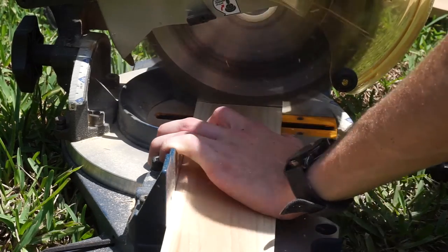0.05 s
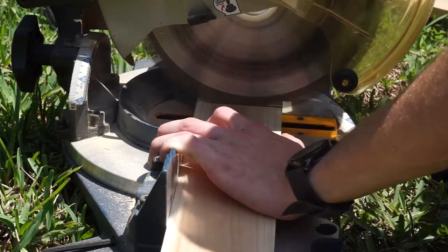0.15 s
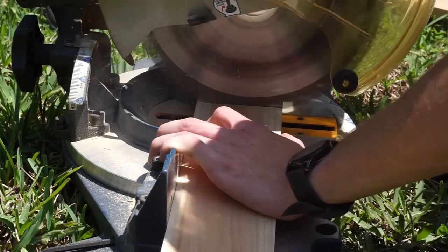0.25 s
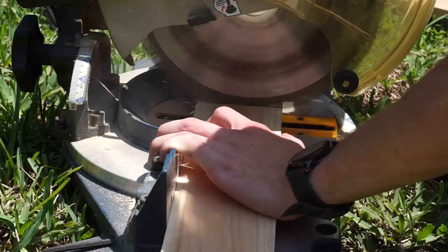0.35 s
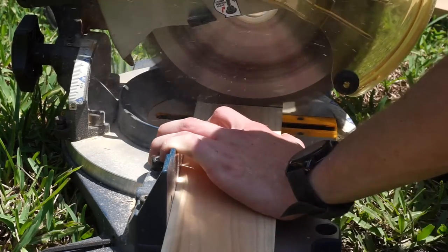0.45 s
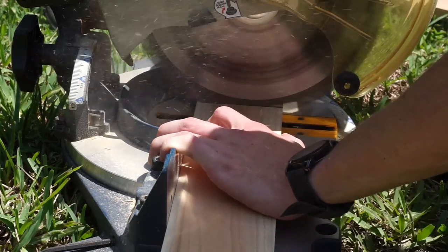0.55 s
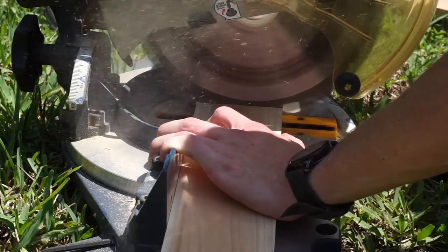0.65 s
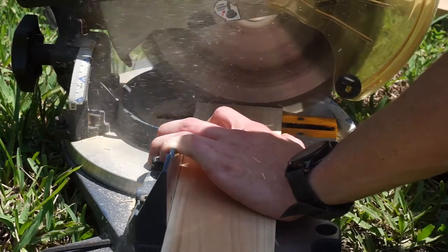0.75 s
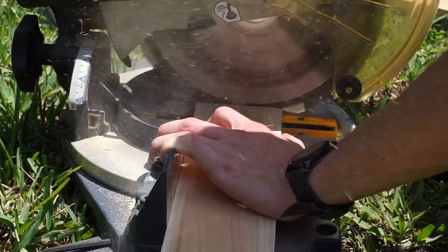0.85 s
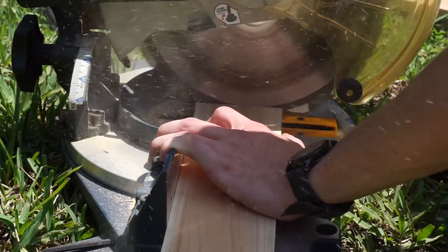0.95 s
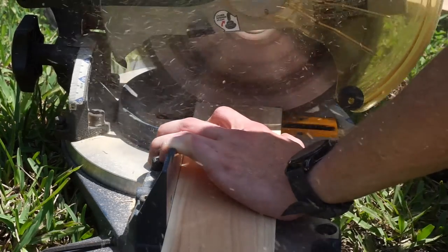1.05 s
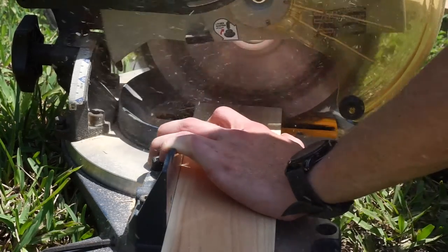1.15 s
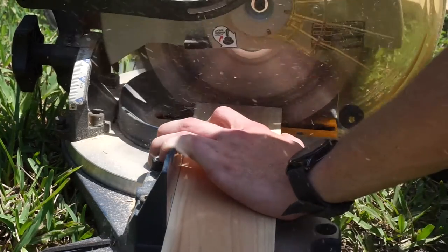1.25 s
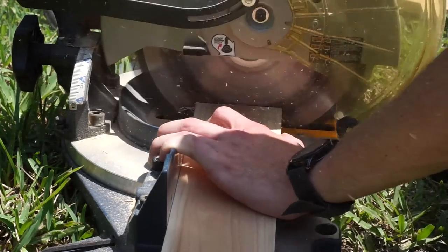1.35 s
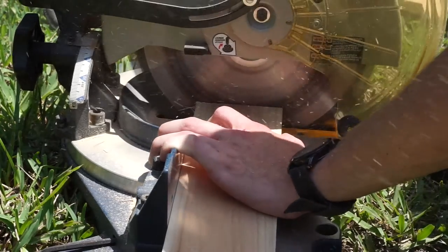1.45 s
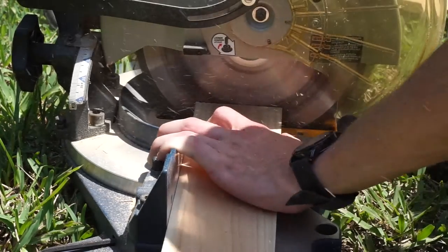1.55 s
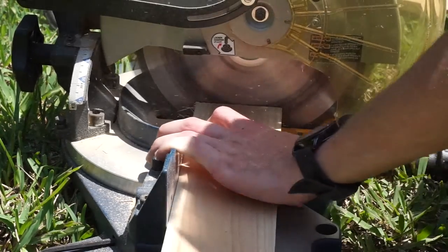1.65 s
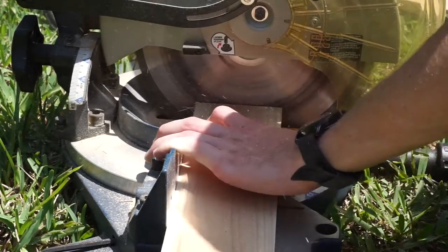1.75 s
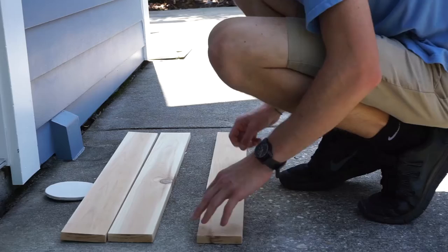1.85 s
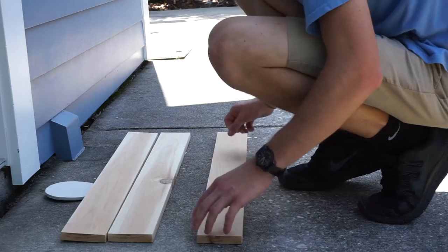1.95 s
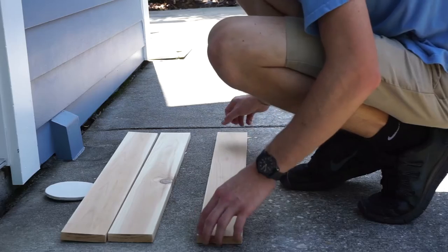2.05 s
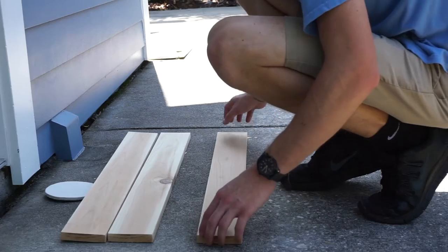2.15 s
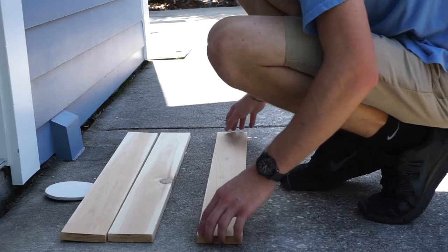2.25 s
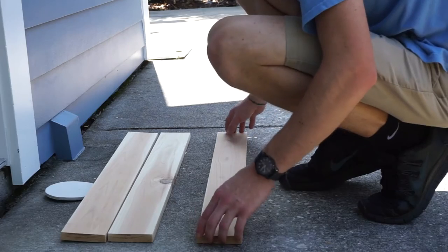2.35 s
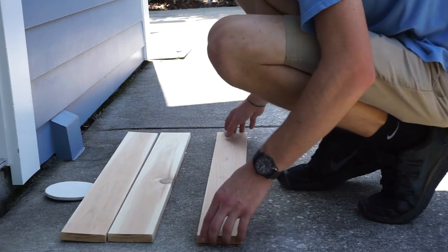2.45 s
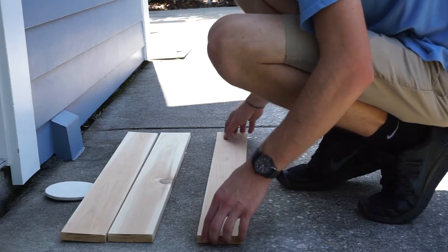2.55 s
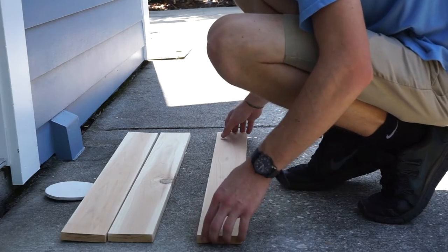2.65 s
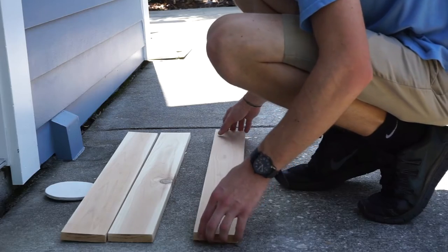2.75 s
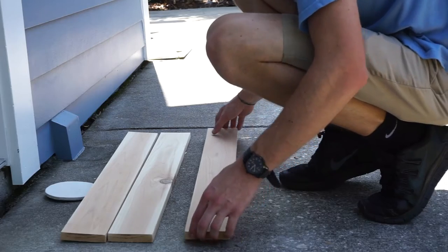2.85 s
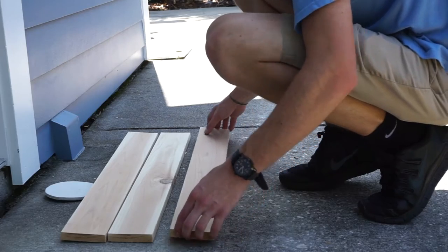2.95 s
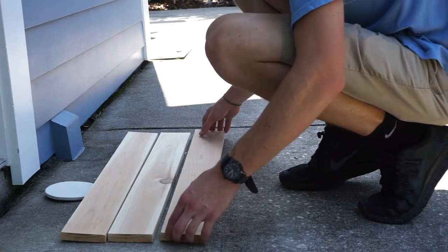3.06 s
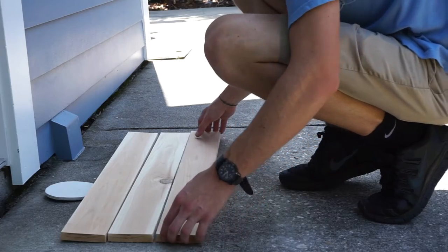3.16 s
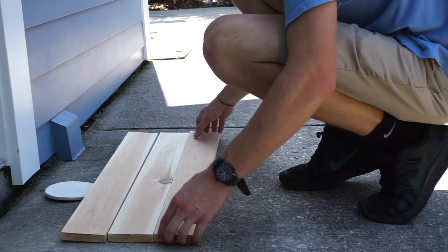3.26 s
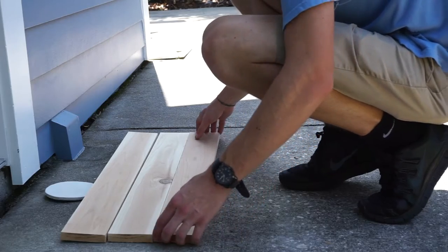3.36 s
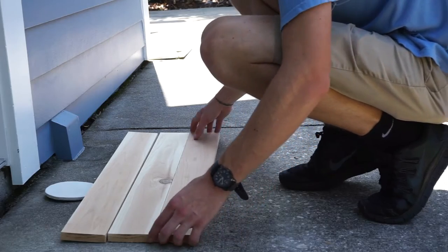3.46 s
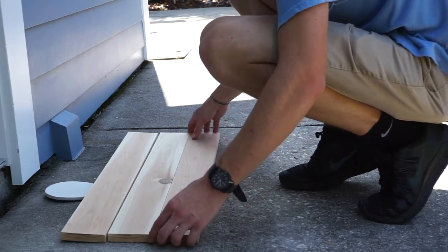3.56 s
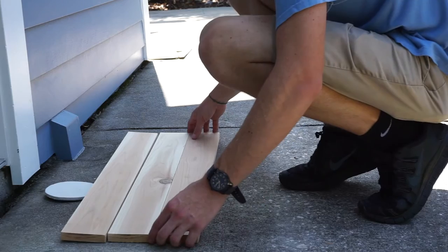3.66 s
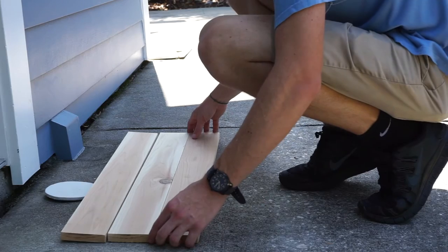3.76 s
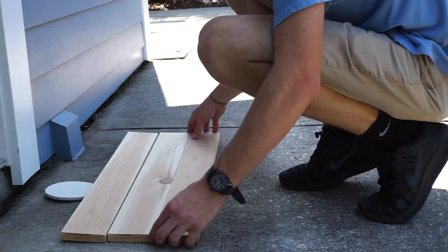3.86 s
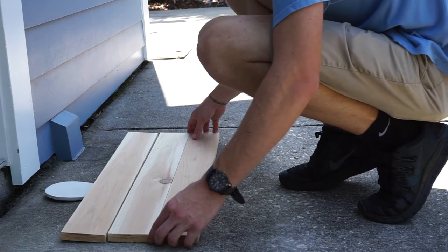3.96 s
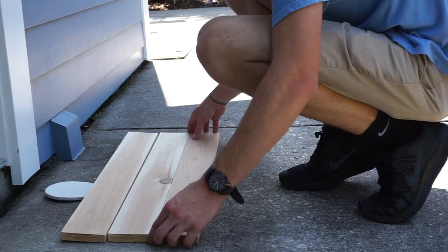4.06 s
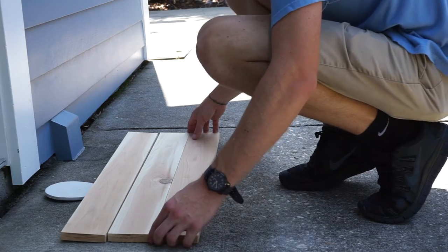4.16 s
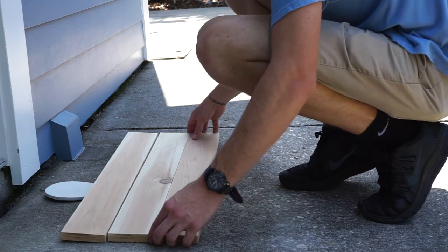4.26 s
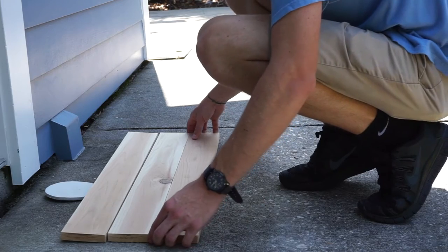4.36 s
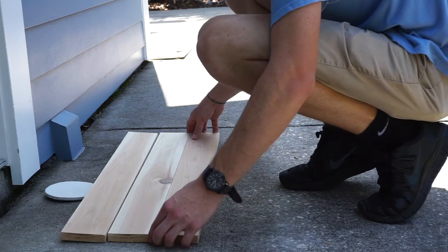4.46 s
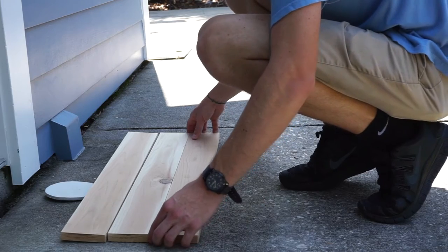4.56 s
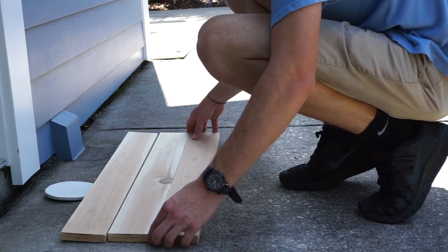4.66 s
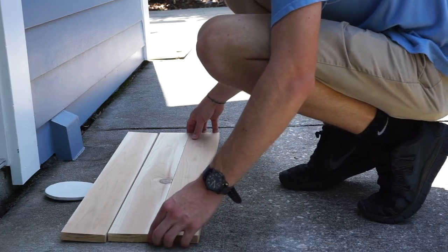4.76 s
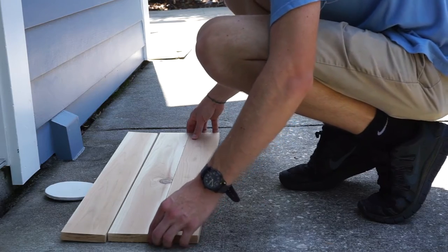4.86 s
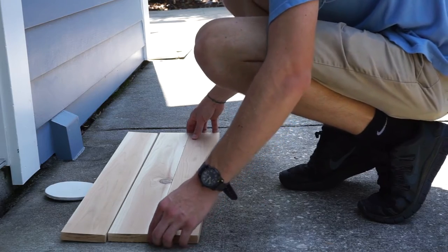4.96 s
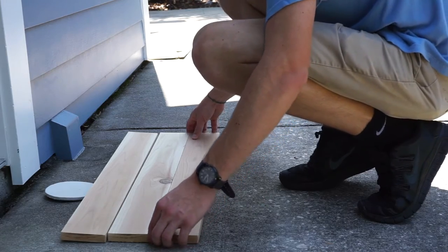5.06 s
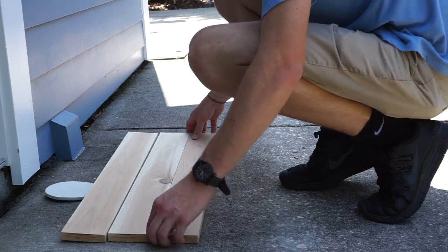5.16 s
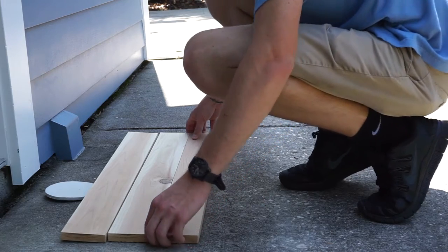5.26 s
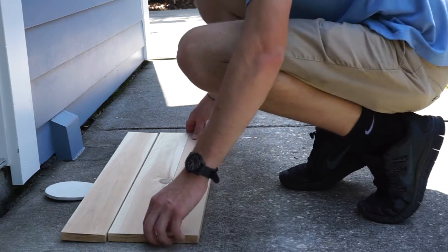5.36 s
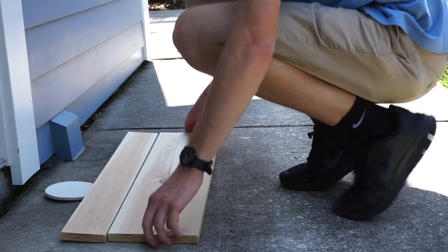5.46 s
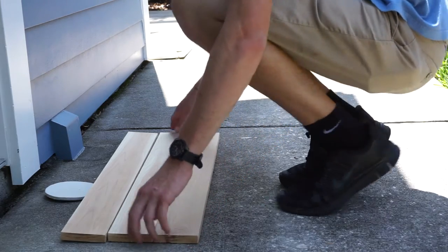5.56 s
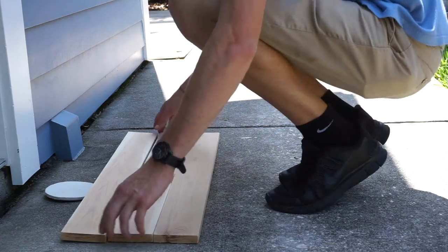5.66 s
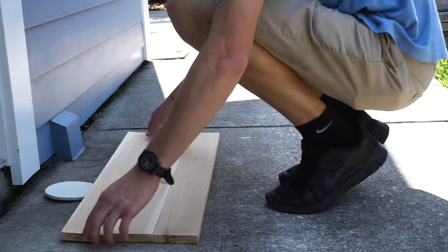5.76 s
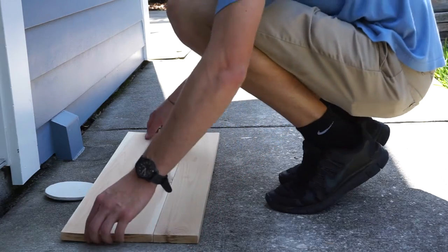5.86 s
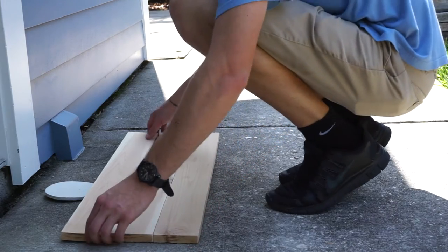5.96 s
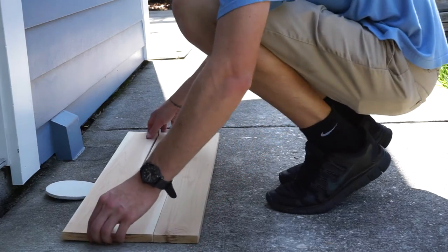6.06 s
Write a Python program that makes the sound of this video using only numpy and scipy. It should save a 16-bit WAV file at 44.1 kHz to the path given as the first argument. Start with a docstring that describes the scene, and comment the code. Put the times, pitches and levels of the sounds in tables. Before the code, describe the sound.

A power saw rasps through a board and brakes with a falling whine, followed by a light wooden knock, a gritty scuff and distant birdsong.

```python
"""On a lawn, a mitre saw cuts a board: teeth strike and tear the wood, the steel blade rings and squeals,
and the motor slows under load, runs free for a moment and is braked with a falling whine.
The scene jumps to a concrete path beside a house: boards knock together and a shoe crushes grit,
while birds sing, an air conditioner hums and traffic passes far off."""
import sys
import numpy as np
from scipy import signal
from scipy.fft import rfft, irfft, next_fast_len
from scipy.io import wavfile

SR = 44100
rng = np.random.default_rng(int(sys.argv[2]) if len(sys.argv) > 2 else 0)


def bounce(signal):
    """Save signal as a 16-bit WAV file at the path given by the first command-line argument."""
    frames = np.transpose(np.atleast_2d(signal))
    limited = np.clip(frames, -1, 1)
    pcm = np.round(limited * 32767).astype(np.int16)
    wavfile.write(sys.argv[1], SR, pcm)


N = 269892
TIME = np.arange(N) / SR
CUT_END_S, BRAKE_S, SCENE_CHANGE_S = 1.109, 1.455, 1.903
TOOTH_COUNT = 24

# Blade speed, sagging under load: time_s, tooth_rate_hz
BLADE_SPEED = [(0, 2015), (.135, 2008), (.94, 1746), (1.04, 1750), (1.12, 1800)]
# Drive partials: multiple_of_turn_rate, level_db
DRIVE_PARTIALS = [(9, -45.5), (29, -44), (53, -49.5), (82, -42), (96, -43), (101, -47.5), (108, -42),
                  (120, -41), (132, -40.5), (144, -40)]
def cutting():
    """The turning blade sets the pace of teeth, drive and the armature, which hums at peak load."""
    tooth_hz, = in_time(BLADE_SPEED)
    tooth_phase = turning(tooth_hz * (1 + 0.000644 * drift(25)))
    turn_phase = tooth_phase / TOOTH_COUNT
    teeth = tooth_tones(tooth_phase) * (1 + 0.2 * np.sin(turn_phase))
    drive = sum(from_db(db) * tone(k * turn_phase, rough=0.56, flutter_hz=7.57)
                for k, db in DRIVE_PARTIALS)
    load = envelope(0.65, hold_s=0.28, attack_s=2.2, release_s=0.2)
    armature = from_db(-48.5) * load * tone(5 * turn_phase, rough=0.2, flutter_hz=8)
    cut = teeth + drive + armature + rasp(tooth_phase, turn_phase) + squeal(turn_phase)
    return cut * until(CUT_END_S, fade_s=0.035)


# Tooth harmonics 1 to 3: level_db
TOOTH_HARMONICS = [-36.5, -35.5, -36]
# Harder bites: start_s, hold_s, harmonic, level_db
TOOTH_BITES = [(0.339, 0.11, 1, -26), (.53, 0.028, 1, -27), (0.621, 0.035, 1, -26), (0.705, 0.029, 1, -31),
               (0.852, 0.029, 3, -32), (0.899, .03, 2, -30), (0.996, .04, 1, -33.5)]
def tooth_tones(tooth_phase):
    """Teeth strike the wood in a steady train; a harder bite swells one harmonic."""
    tones = 0
    for k, steady_db in enumerate(TOOTH_HARMONICS, 1):
        bites = sum(from_db(db) * envelope(start_s, hold_s, attack_s=0.09, release_s=0.13)
                    for start_s, hold_s, harmonic, db in TOOTH_BITES if harmonic == k)
        tones += (from_db(steady_db) + bites) * tone(k * tooth_phase, rough=0.25, flutter_hz=29)
    return tones


# Chip rasp loudness: time_s, relative_db
RASP_CURVE = [(0.0, -26.5), (0.214, -28.5), (0.25, -22.5), (0.372, -29.5), (0.572, -24), (0.612, -28),
              (0.752, -24), (1.1, -25.5)]
# Chip rasp spectrum: frequency_hz, density_db
RASP_SPECTRUM = [(880, -23.5), (1500, -22.5), (1900, -13.5), (2150, -5.5), (2750, -18.5), (3300, -18.5),
                 (3700, -9.5), (4400, -12.5), (5000, -9), (5900, -8), (6600, 2.5), (7500, 0.5), (8100, 1.5),
                 (8800, 1), (9300, 0.5), (10600, 5), (11200, -9)]
def rasp(tooth_phase, turn_phase):
    """Chips tear out in pulses, one per tooth."""
    level_db, = in_time(RASP_CURVE)
    strokes = (1 + 0.79 * np.sin(tooth_phase)) * (1 + 0.15 * np.sin(turn_phase))
    torn = tearing(turn_phase, blows_db=0, grain_hz=1.68)
    return from_db(level_db + 2) * shaped(torn * strokes, RASP_SPECTRUM)


# Squeal spectrum: frequency_hz, density_db
SQUEAL_SPECTRUM = [(8800, -23), (9700, -9), (10300, -1.5), (10800, 7), (11300, -36)]
def squeal(turn_phase, fade_db_per_s=7):
    """The squeal throbs as the blade wobbles and flares when it rubs."""
    throb = 1 + 0.3 * np.sin(2 * turn_phase) + 0.42 * np.sin(4 * turn_phase)
    torn = tearing(turn_phase, blows_db=6, grain_hz=2.5)
    level = from_db(-27 - fade_db_per_s * TIME) + rubbing()
    return level * shaped(torn * throb, SQUEAL_SPECTRUM)


# Saw stereo width: frequency_hz, side_minus_mid_db
SAW_SIDE = [(60, -12.5), (130, -17.5), (270, -18), (570, -18.5), (1200, -13), (2550, -7.5), (5390, -6),
            (11400, -7.5)]
def tearing(turn_phase, blows_db, grain_hz):
    """Repeating tooth blows change slowly with the grain; chips break at random."""
    blend = 0.45 * drift(grain_hz)
    blows = [np.cos(blend) * tooth_blows(turn_phase) + np.sin(blend) * tooth_blows(turn_phase)
             for _ in range(2)]
    chips = casing(grains(per_s=27000, spread_db=9), t60_s=0.0937, wet=1)
    return spread(from_db(blows_db) * np.array(blows) + chips, SAW_SIDE)


def tooth_blows(turn_phase, points=2048, harmonics=170):
    """No two teeth are alike, so one ragged pattern returns on every turn."""
    partials = rng.uniform(0.4, 1.4, harmonics) ** 2 * np.exp(2j * np.pi * rng.random(harmonics))
    pattern = irfft(np.append(0, partials), points)
    angles = np.linspace(0, 2 * np.pi, points, endpoint=False)
    return rms_one(np.interp(turn_phase, angles, pattern, period=2 * np.pi))


# Blade rubs: start_s, hold_s, relative_db
KERF_RUBS = [(.195, .04, -27), (.955, 0.017, -35), (1.03, 0.0078, -37)]
def rubbing():
    """Gain of the screeches where the blade rubs the kerf."""
    return sum(from_db(db) * envelope(start_s, hold_s, attack_s=0.2, release_s=0.087)
               for start_s, hold_s, db in KERF_RUBS)


# High blade modes: pitch_hz, relative_db
PINCH_MODES = [(5760, -45), (7020, -38), (7488, -42), (8016, -44.5), (8737, -38.5), (8893, -42),
               (9615, -41), (10255, -45), (10497, -38)]
def pinched_blade(deep_s=0.8, shriek_hz=10560):
    """High modes grow as the blade sinks into the wood; one shrieks at each rub."""
    modes = sum(from_db(db) * tone(2 * np.pi * hz * TIME, rough=1.2, flutter_hz=17.8)
                for hz, db in PINCH_MODES)
    depth = envelope(deep_s, CUT_END_S - deep_s, attack_s=3.03, release_s=0.15)
    shriek = rubbing() * tone(2 * np.pi * shriek_hz * TIME, rough=1.2, flutter_hz=90)
    return from_db(1.5) * depth * modes + from_db(-2) * shriek


# Motor loudness in the cut: time_s, roar_relative_db, air_relative_db
MOTOR_CURVE = [(0.0, -32, -30), (0.032, -27.5, -29), (0.288, -36, -39.5), (0.314, -33, -34),
               (0.348, -39, -40), (0.406, -35, -32.5), (0.692, -37, -38.5), (1.086, -33.5, -33),
               (1.1, -33.5, -33)]
def motor():
    """The running motor shakes the housing, moves air and keeps the blade ringing."""
    roar_db, air_db = in_time(MOTOR_CURVE)
    return housing_roar(roar_db) + air_rush(air_db) + blade_ring(roar_db)


# Housing spectrum: frequency_hz, density_db
ROAR_SPECTRUM = [(60, -63), (150, -34), (280, -22.5), (450, -12), (660, -0.5), (1000, 3), (1250, -6),
                 (1550, 0), (2300, -5), (3200, -13.5), (6000, -17), (11000, -42.5)]
def housing_roar(cut_db, rise_db_per_s=10):
    """The housing roars louder as the freed motor speeds up and fades under the brake."""
    level = from_db(cut_db + 0.5 + rise_db_per_s * free_run_s() + 0.9 * drift(40))
    roar = shaped(casing(noise(SAW_SIDE), t60_s=0.06, wet=0.36), ROAR_SPECTRUM)
    return level * speed_left() ** 1.45 * roar


# Air at speed: frequency_hz, density_db
RUSH_SPECTRUM = [(1200, -29), (2000, -5), (2800, 0.5), (3300, -2.5), (3800, -2), (4200, 2.5), (4600, 0.5),
                 (5100, -0.5), (5800, 0), (6400, 3), (7000, 0.5), (7500, -3), (7900, -2.5), (9000, -4.5),
                 (11000, -7.5)]
# Hollow of the guard: frequency_hz, density_db
GUARD_SPECTRUM = [(1200, -2.5), (1900, -9), (2400, 8), (3150, -6), (3500, 0.5), (3900, 3), (4400, -5.5),
                  (4950, -14), (5500, -14), (5850, -1), (6150, 4), (6700, -3.5), (7600, -5), (9200, -9.5),
                  (11000, -11.5)]
def air_rush(cut_db, rise_db_per_s=7):
    """Air rushes through fan and teeth; as they slow, the hollow of the guard is left."""
    rush = shaped(casing(noise(SAW_SIDE), t60_s=0.075, wet=0.76), RUSH_SPECTRUM)
    hollow = from_db(0.5) * shaped(noise(SAW_SIDE), GUARD_SPECTRUM)
    rush_share = until(1.563, fade_s=0.15)
    air = np.sqrt(rush_share) * rush + np.sqrt(1 - rush_share) * hollow
    chip_stream_db = 2.5 * until(CUT_END_S, fade_s=0.04)
    level = from_db(cut_db + 4.5 + chip_stream_db + rise_db_per_s * free_run_s() + 0.97 * drift(60))
    return level * speed_left() ** 1.42 * air


# Blade and guard modes: pitch_hz, width_hz, relative_db
STEEL_MODES = [(672.6, 41, -39.5), (1093, 22, -41.5), (1382, 8.7, -42.5), (2214, 30, -39.5),
               (2540, 13, -41.5), (2855, 16, -43), (3086, 20.06, -40.5), (3420, 16, -43.5),
               (3644, 16, -42.5), (3800, 19.7, -45), (3850, 20, -40.5), (4020, 16, -39.5),
               (4770, 16, -47.5), (5538, 20.2, -38.5), (6010, 27.7, -48), (6526, 40, -43)]
def blade_ring(roar_db, fade_db_per_s=27.5, exit_hz=3640):
    """Steel rings with the roar, sounds a last note on leaving the kerf and fades."""
    steel = sum(from_db(db) * tone(2 * np.pi * hz * TIME, rough=1.5, flutter_hz=width_hz / 2)
                for hz, width_hz, db in STEEL_MODES)
    steel_db = roar_db + 31.5 - fade_db_per_s * np.maximum(TIME - CUT_END_S, 0)
    exit_level = from_db(-29) * envelope(CUT_END_S, 0, attack_s=0.3, release_s=1.26)
    exit_note = tone(2 * np.pi * exit_hz * TIME, rough=0.404, flutter_hz=12)
    return from_db(steel_db) * steel + exit_level * exit_note


def fan(start_hz=4330, rise_hz_per_s=1900):
    """Two turbulent bands rise with the freed motor and fall with the brake."""
    phase = turning((start_hz + rise_hz_per_s * free_run_s()) * speed_left())
    lower = tone(phase, rough=5.2, flutter_hz=300)
    upper = from_db(0.5) * tone(1.52 * phase, rough=6, flutter_hz=405)
    level = from_db(-36) * envelope(CUT_END_S, BRAKE_S - CUT_END_S, attack_s=0.25, release_s=0.4)
    return level * (lower + upper)


# Housing peak and notch: centre_hz, width_hz, gain_db
HOUSING_RESONANCES = [(684, 40, 14), (1212, 240, -6.5)]
def brake(start_hz=2304):
    """The braked motor's whine glides down through the housing resonances, gear tones above it."""
    hz = start_hz * speed_left()
    phase = turning(hz * (1 + 0.03 * drift(200)))
    gears = from_db(-4) * tone(1.78 * phase, rough=1.6, flutter_hz=110)
    gears += from_db(-8) * tone(3.2 * phase, rough=2.3, flutter_hz=250)
    gears *= until(2.02, fade_s=0.17) * (1 - until(1.475, fade_s=0.08))
    housing_db = sum(db / (1 + (2 * (hz - centre_hz) / width_hz) ** 2)
                     for centre_hz, width_hz, db in HOUSING_RESONANCES)
    whine = from_db(housing_db) * tone(phase, rough=0.8, flutter_hz=110)
    level = from_db(-28.5) * envelope(BRAKE_S, 0, attack_s=0.18, release_s=1.3)
    return casing(level * (whine + gears), t60_s=0.072, wet=0.53)


def free_run_s():
    """Time run without load, held once the brake closes."""
    return np.clip(TIME, CUT_END_S, BRAKE_S) - CUT_END_S


def speed_left(quarter_speed_s=0.49):
    """Share of motor speed left under the brake."""
    return 1 / (1 + np.maximum(TIME - BRAKE_S, 0) / quarter_speed_s) ** 2


def casing(x, t60_s, wet):
    """Guard, fence and table ring briefly at many close frequencies."""
    t = TIME[:SR // 8]
    tail = rng.standard_normal((1, len(t))) * from_db(-60 * t / t60_s)
    return x + wet * signal.fftconvolve(x, tail / np.sqrt(np.sum(tail ** 2)), axes=1)[:, :N]


# Sand under the sole: time_s, relative_db
SOLE_CURVE = [(5.36, -69), (5.448, -53.5), (5.472, -47), (5.482, -35.5), (5.528, -27), (5.576, -32),
              (5.61, -28.5), (5.704, -54), (6.0, -79)]
# Light board slides: start_s, hold_s, level_db, attack_s, release_s
BOARD_SLIDES = [(3.143, 0.21, -56.5, .28, .8), (6.059, .005, -42.5, .09, .24)]
# Crushed sand spectrum: frequency_hz, density_db
SAND_SPECTRUM = [(180, -55), (300, -26), (473, -13.5), (518, -16), (650, -5.5), (803, -2.5), (1120, -14),
                 (1250, -4), (1430, -9.5), (1560, -14), (1710, -10), (2050, -6), (5330, -12), (9630, -14.5),
                 (11200, -12.5), (14600, -47), (22000, -120)]
# Scuff stereo width: frequency_hz, side_minus_mid_db
SCUFF_SIDE = [(60, -24), (170, -14), (490, -17), (1400, -11), (3990, 1), (11400, 1)]
def scuff():
    """Sole and boards slide over concrete, crushing a dense stream of sand grains."""
    sole_db, = in_time(SOLE_CURVE)
    start_s, end_s = SOLE_CURVE[0][0], SOLE_CURVE[-1][0]
    sole = from_db(sole_db + 5) * envelope(start_s, end_s - start_s, attack_s=0.2, release_s=0.2)
    slides = sum(from_db(db) * envelope(s, hold_s, attack_s, release_s)
                 for s, hold_s, db, attack_s, release_s in BOARD_SLIDES)
    sand = spread(grains(per_s=11000, spread_db=1), SCUFF_SIDE) * from_db(0.73 * drift(130))
    return (sole + slides) * shaped(sand, SAND_SPECTRUM) + sole_ring()


# Sole and board modes: pitch_hz, relative_db, t60_s
SOLE_MODES = [(880, 1.5, 0.062), (1360, -20, 0.033), (1586, 14, 0.022), (1900, 10.5, 0.022),
              (2460, 6, 0.025), (2720, 3, 0.026), (2880, -2, 0.028)]
def sole_ring():
    """Grains slipping under pressure ring sole and boards, which radiate little bass."""
    slips = spread(grains(per_s=2300, spread_db=2.5), SCUFF_SIDE)
    modes = [(hz, from_db(db) * ring(slips, hz, t60_s)) for hz, db, t60_s in SOLE_MODES]
    body = sum(pressure(hz) * mode for hz, mode in modes) / np.std(sum(mode for _, mode in modes))
    return colour(body, [(150, -65), (300, -31), (700, -3.5), (3000, 0.5), (6000, -17), (6600, -77)])


# Weight on the sole: start_s, hold_s, relative_db, tilt_db_per_octave
SOLE_PUSHES = [(5.468, .003, -39, -7), (5.489, 0.017, -28, 4), (5.517, 0.017, -26, -7),
               (5.606, .005, -27.5, -10), (5.633, .005, -34, 12)]
def pressure(hz, pivot_hz=1586):
    """How hard the pushes drive a mode of this pitch."""
    octaves = np.log2(hz / pivot_hz)
    return sum(from_db(db + tilt * octaves) * envelope(start_s, hold_s, attack_s=0.034, release_s=0.1)
               for start_s, hold_s, db, tilt in SOLE_PUSHES)


# Board contacts: start_s, relative_db
BOARD_KNOCKS = [(3.2205, -31.5), (3.2285, -52), (3.2365, -38)]
# Board modes: pitch_hz, relative_db, t60_s
BOARD_MODES = [(527, -12, 0.087), (618, -8, .05), (690, -1, 0.09), (1070, -11.5, 0.066), (1324, -11, 0.068),
               (1720, -11, .025), (2040, -9, .03), (2410, -7.5, 0.038)]
def boards():
    """A narrow board knocks on its neighbour and rings with little bass."""
    clicks = np.zeros(N)
    for start_s, db in BOARD_KNOCKS:
        clicks[int(start_s * SR)] = from_db(db)
    wood = sum(from_db(db) * ring(clicks, hz, t60_s) for hz, db, t60_s in BOARD_MODES)
    wood = colour(wood, [(150, -24), (480, -0.5)])
    return wood + from_db(-6) * echoes(wood, t60_s=0.16)


# Cracking grit: start_s, level_db, centre_hz, t60_s
GRIT_CRACKS = [(2.227, -44.5, 2600, 0.22), (2.776, -43, 2800, .05), (2.856, -45.5, 5240, 0.028),
               (3.30, -50.5, 2400, 0.61), (5.078, -47, 5200, .025), (5.466, -42, 2000, .025),
               (5.481, -28, 7000, 0.02), (5.4895, -28, 2460, 0.056), (6.063, -57, 6000, .1)]
def grit():
    """Grit cracks under boards and fingers in short bursts."""
    crackle = spread(grains(per_s=7800, spread_db=4), YARD_SIDE)
    cracks = 0
    for start_s, db, hz, t60_s in GRIT_CRACKS:
        level = from_db(db - 60 * np.maximum(TIME - start_s, 0) / t60_s) * (TIME >= start_s)
        cracks += level * shaped(crackle, [(hz / 5, -12), (hz, 0), (11000, -14)])
    return cracks


def near_bird(start_s=5.67, hold_s=0.26, start_hz=2450, sag_hz_per_s=950, fade_db_per_s=9):
    """One wavering whistle sinks, swells once and fades."""
    age_s = np.clip(TIME - start_s, 0, 2 * hold_s)
    phase = turning((start_hz - sag_hz_per_s * age_s) * (1 + 0.012 * drift(114)))
    overtone = 0.15 * tone(2 * phase, rough=2, flutter_hz=90)[0]
    held = envelope(start_s, hold_s, attack_s=0.08, release_s=0.15)
    swell = from_db(-41) * envelope(5.728, hold_s=0.0089, attack_s=0.08, release_s=0.059)
    level = from_db(-49 - fade_db_per_s * age_s + 2.9 * drift(30)) * held + swell
    whistle = level * (np.sin(phase) + overtone)
    return whistle + 0.4 * echoes(whistle, t60_s=0.25)


# Two-note calls: start_s, first_pitch_hz, first_relative_db, second_relative_db
TWO_NOTE_CALLS = [(2.282, 3650, -48, -45.5), (2.523, 3535, -47, -48), (2.823, 3400, -47, -48.5),
                  (3.76, 3690, -47.5, -48), (4.018, 3380, -46, -47), (5.888, 3210, -51, -54)]
def far_birds():
    """Two-note calls and a sinking run of even notes, smeared by the trees."""
    warble = 1 + 0.0395 * drift(182)
    song = np.zeros(N)
    for start_s, hz, first_db, second_db in TWO_NOTE_CALLS:
        song += from_db(first_db) * chirp(start_s, warble, length_s=0.069, start_hz=hz, fall=0.23)
        song += from_db(second_db) * chirp(start_s + 0.114, warble, length_s=0.05, start_hz=3645, fall=0.14)
    for k in range(6):
        note = chirp(4.657 + 0.136 * k, warble, length_s=0.093, start_hz=3250 - 44 * k, fall=0.135)
        song += from_db(-52) * note
    return from_db(-2) * song + from_db(2.5) * echoes(song, t60_s=0.85)


def chirp(start_s, warble, length_s, start_hz, fall):
    """One warbling note that loses the share `fall` of its pitch."""
    progress = np.linspace(0, 1, int(length_s * SR))
    span = int(start_s * SR) + np.arange(len(progress))
    hz = start_hz * (1 - fall + fall * (1 - progress) ** 1.4) * warble[span]
    note = np.zeros(N)
    note[span] = np.sin(turning(hz)) * np.sqrt(np.abs(np.sin(np.pi * progress)))
    return note


# Air conditioner partials: pitch_hz, level_db
HUM_PARTIALS = [(58.3, -59.5), (118.5, -62.5), (177, -66.5)]
def air_conditioner():
    """A low hum wavers in phase and strength."""
    hum = 0
    for hz, db in HUM_PARTIALS:
        partial = np.sin(2 * np.pi * hz * TIME + 0.55 * drift(2.4))
        hum += from_db(db) * rms_one(partial * (1 + 0.46 * drift(6.7)))
    return hum


# Far traffic spectrum: frequency_hz, density_db
TRAFFIC_SPECTRUM = [(15, -48), (25, -31), (44, -20), (64, -13), (81, -15), (119, -1.5), (146, -10),
                    (426, -6), (509, -9), (657, -7), (1490, -13), (2360, -17.5), (2970, -18.5),
                    (3930, -24.5), (11200, -34.5), (14600, -69), (22000, -120)]
# Yard stereo width: frequency_hz, side_minus_mid_db
YARD_SIDE = [(60, -28), (140, -17), (350, -10), (830, -5), (1980, -2), (4760, 0), (11400, 0.5)]
def traffic():
    """Far traffic blends into a low, slightly flickering wash."""
    return from_db(-46.79 + 0.81 * drift(18)) * shaped(noise(YARD_SIDE), TRAFFIC_SPECTRUM)


def echoes(x, t60_s):
    """Diffuse scatter from walls and trees, different at each ear."""
    t = TIME[:SR]
    tail = rng.standard_normal((2, len(t))) * from_db(-60 * t / t60_s)
    tail /= np.sqrt(np.sum(tail ** 2, axis=1, keepdims=True))
    return spread(signal.fftconvolve(x[None], tail, axes=1)[:, :N], YARD_SIDE)


def from_db(db):
    """Decibels to gain."""
    return 10 ** (np.asarray(db) / 20)


def rms_one(x):
    """Scale to unit power."""
    return x / np.sqrt(np.mean(x ** 2) + 1e-20)


def in_time(rows):
    """Each column of a curve at every sample."""
    time_s, *columns = np.transpose(rows)
    return [np.interp(TIME, time_s, column) for column in columns]


def turning(hz):
    """Running phase in radians."""
    return 2 * np.pi * np.cumsum(hz) / SR


def until(end_s, fade_s):
    """Linear fade from one to zero, centred on end_s."""
    return np.clip(0.5 + (end_s - TIME) / fade_s, 0, 1)


def envelope(start_s, hold_s, attack_s, release_s):
    """Rise to one at start_s, hold, decay; attack and release each span 60 dB."""
    before = np.maximum(start_s - TIME, 0) / attack_s
    after = np.maximum(TIME - start_s - hold_s, 0) / release_s
    return from_db(-60 * (before + after))


def colour(x, spectrum, share=1):
    """Filter by rows of frequency_hz, gain_db, the decibels scaled by share."""
    hz, db = np.transpose(spectrum)
    size = next_fast_len(N)
    bins_hz = np.maximum(np.fft.rfftfreq(size, 1 / SR), 1)
    gain = from_db(share * np.interp(np.log(bins_hz), np.log(hz), db))
    return irfft(rfft(x, size) * gain, size)[..., :N]


def shaped(x, spectrum):
    """Apply a spectrum that falls away beyond its ends; unit power."""
    (low_hz, low_db), (high_hz, high_db) = spectrum[0], spectrum[-1]
    return rms_one(colour(x, [(low_hz / 2, low_db - 40), *spectrum, (high_hz * 1.1, high_db - 60)]))


def drift(rate_hz, step=20, settle=2000):
    """Random wander of unit power, low-passed at rate_hz."""
    pole = np.exp(-2 * np.pi * rate_hz * step / SR)
    white = rng.standard_normal(N // step + settle + 2)
    slow = signal.lfilter([1], [1, -2 * pole, pole * pole], white)[settle:]
    return np.interp(np.arange(N) / step, np.arange(len(slow)), rms_one(slow))


def spread(pair, width):
    """Mid and side to left and right, the side filtered by width."""
    side = colour(pair[1], width)
    return np.array([pair[0] + side, pair[0] - side])


def noise(width):
    """Broadband stereo noise."""
    return spread(rng.standard_normal((2, N)), width)


def ring(x, hz, t60_s):
    """One mode: a unit click starts a decaying unit sine."""
    radius, angle = from_db(-60 / (t60_s * SR)), 2 * np.pi * hz / SR
    return signal.lfilter([0, np.sin(angle)], [1, -2 * radius * np.cos(angle), radius ** 2], x + 1e-18)


def grains(per_s, spread_db):
    """Random clicks of uneven size in two unrelated channels."""
    sizes = from_db(spread_db * np.minimum(rng.exponential(1, (2, N)), 4))
    signs = rng.choice([-1, 1], (2, N))
    return rms_one(sizes * signs * (rng.random((2, N)) < per_s / SR))


def tone(phase, rough, flutter_hz):
    """A partial fluttering in strength and phase, slightly differently at each ear."""
    mid = np.sin(phase) * (1 + rough * drift(flutter_hz)) + np.cos(phase) * rough * drift(flutter_hz)
    side = np.sin(phase + drift(2.2)) * 0.16 * drift(4.5)
    return rms_one(np.array([mid + side, mid - side]))


def placed(x, lean):
    """Lean each frequency left or right."""
    return np.array([colour(x[0], lean, share=0.35), colour(x[1], lean, share=-0.73)])


# Saw stereo lean: frequency_hz, leftward_relative_db
SAW_LEAN = [(60, 1.5), (130, 1.5), (270, -1), (570, -0.5), (1200, -1), (2550, -3.5), (5390, 1),
            (11400, -1.5)]
# Scuff stereo lean: frequency_hz, leftward_relative_db
SCUFF_LEAN = [(60, 0.0), (220, -0.5), (830, -1.2), (3070, -2.0), (11400, 0.27)]
def scene():
    """The saw, then abruptly the path."""
    saw = placed(cutting() + pinched_blade() + motor() + fan() + brake(), SAW_LEAN)
    background = air_conditioner() + traffic() + far_birds() + near_bird()
    path = background + boards() + grit() + placed(scuff(), SCUFF_LEAN)
    at_saw = until(SCENE_CHANGE_S, fade_s=0.0023)
    return at_saw * saw + (1 - at_saw) * path


def record(dry):
    """Steep low-pass on the top treble."""
    cutoff_hz = 11020
    return signal.sosfilt(signal.ellip(12, 0.1, 80, cutoff_hz, fs=SR, output="sos"), dry)


dry = scene()
out = record(dry)
bounce(out)
```